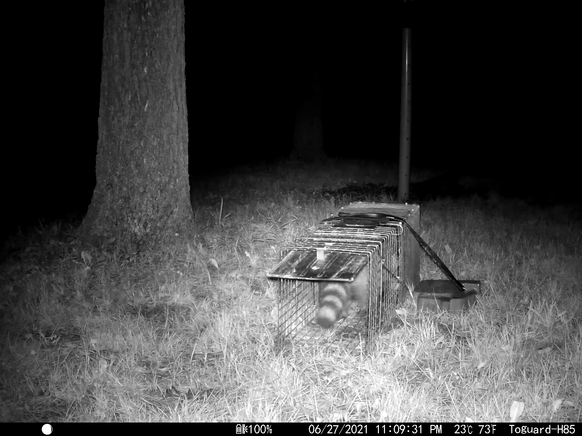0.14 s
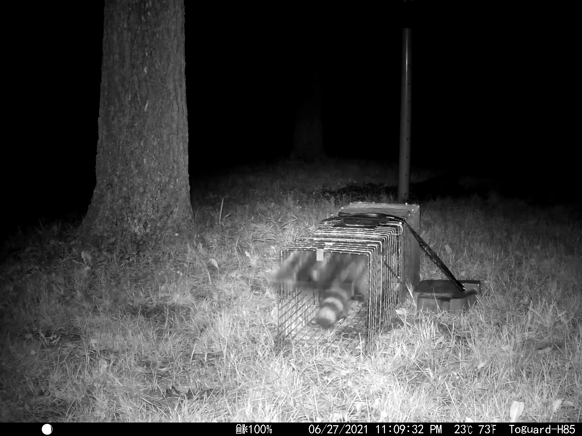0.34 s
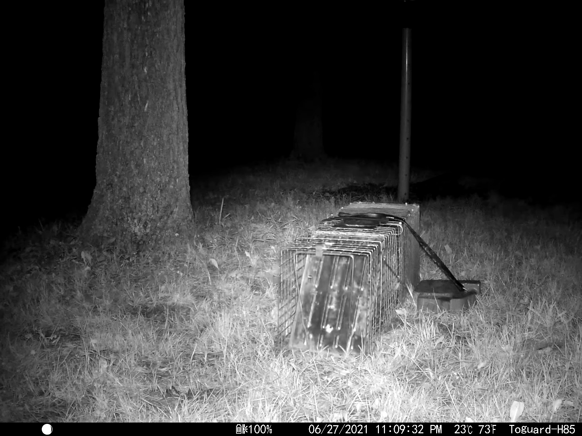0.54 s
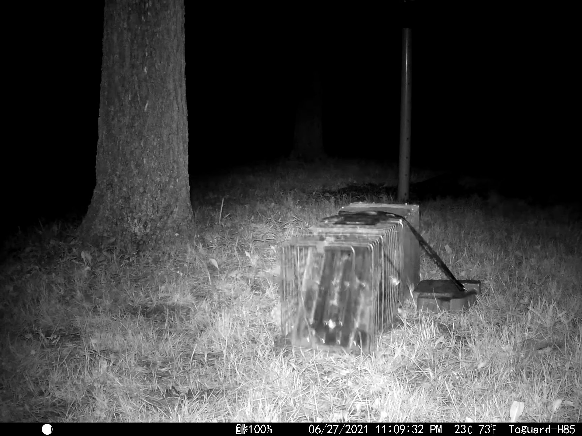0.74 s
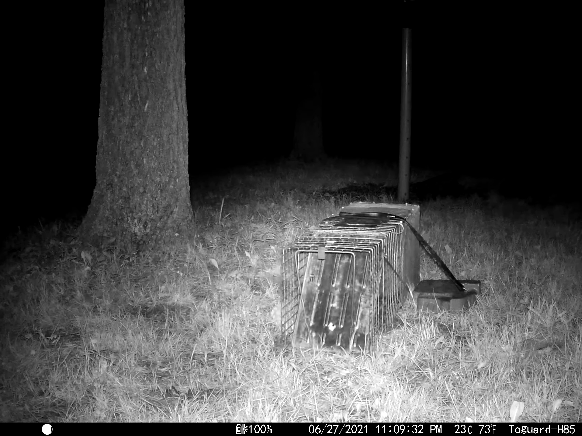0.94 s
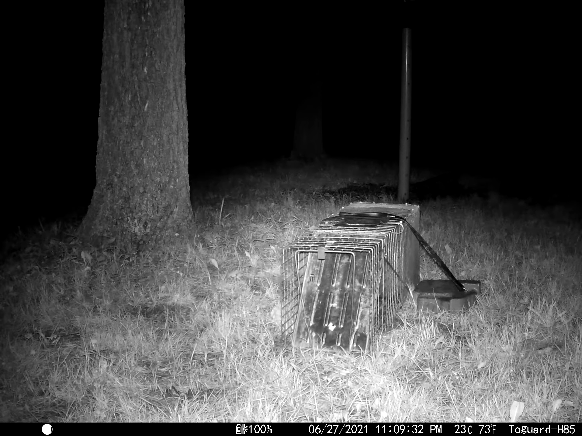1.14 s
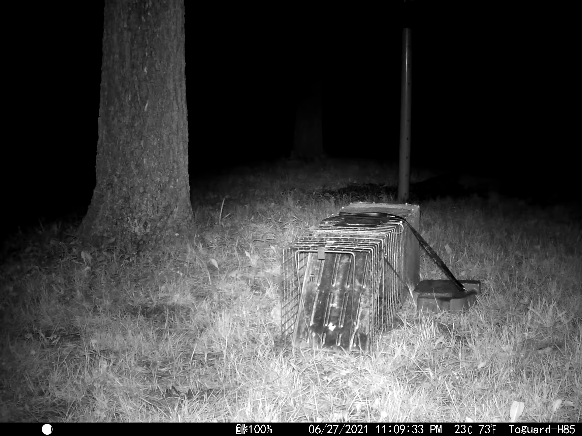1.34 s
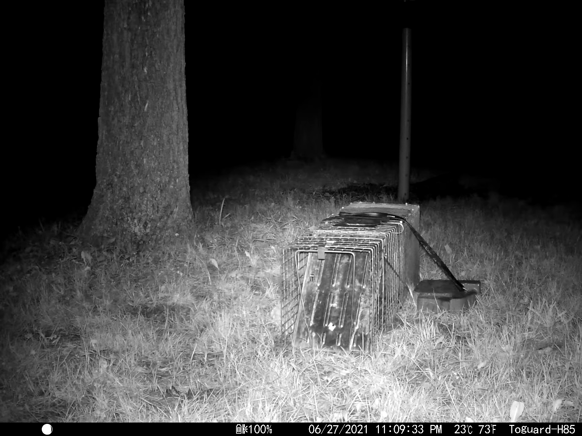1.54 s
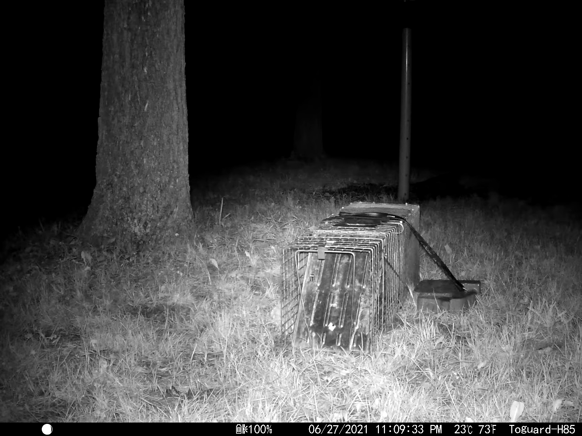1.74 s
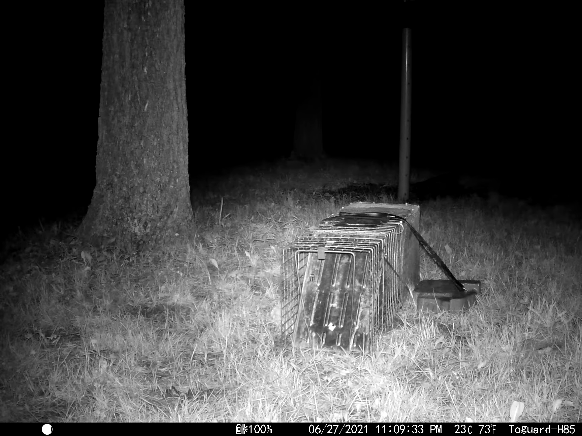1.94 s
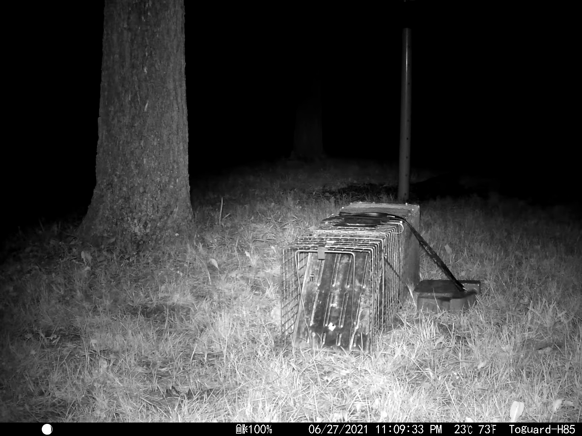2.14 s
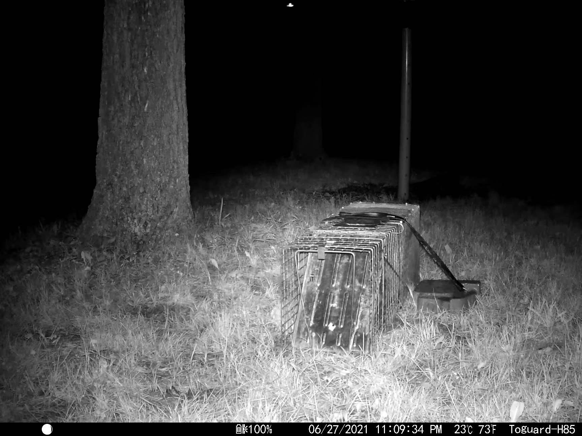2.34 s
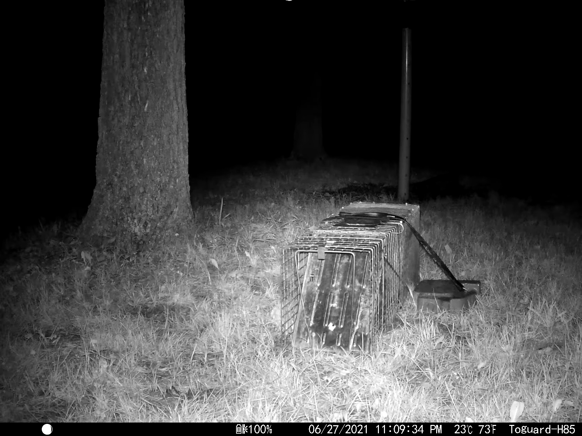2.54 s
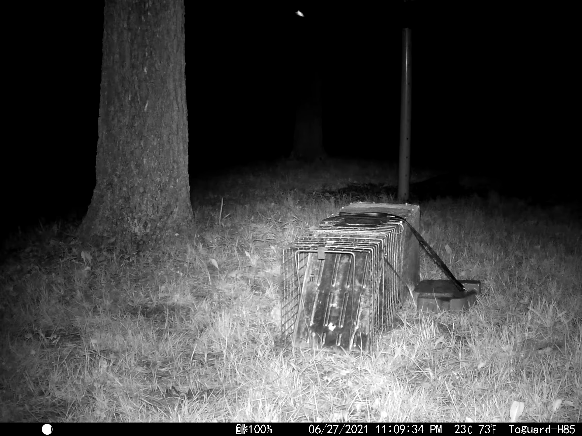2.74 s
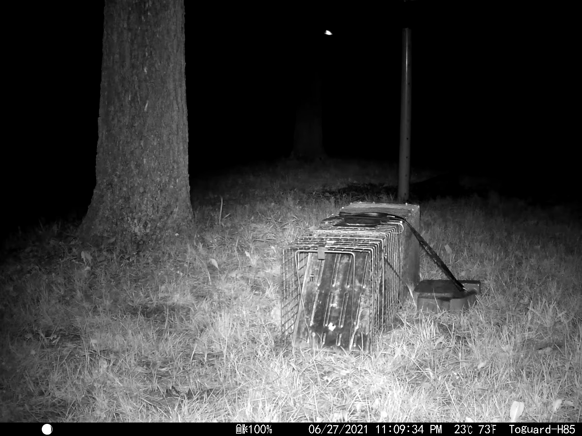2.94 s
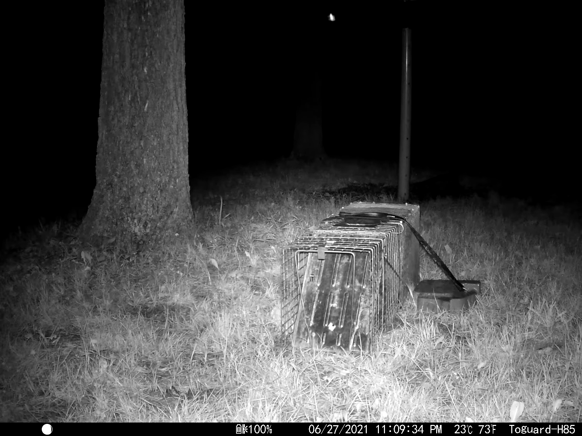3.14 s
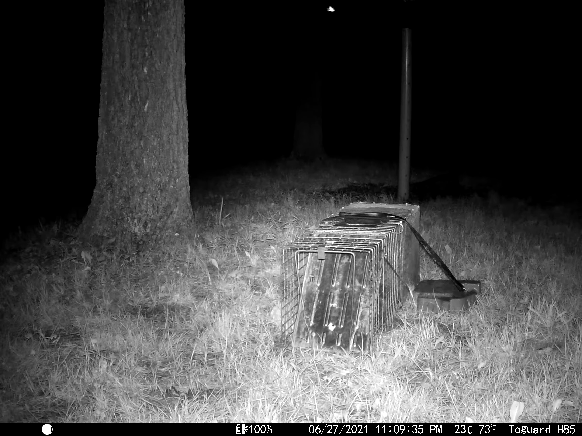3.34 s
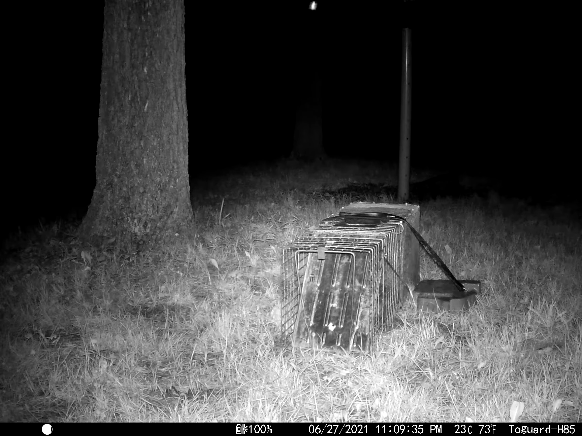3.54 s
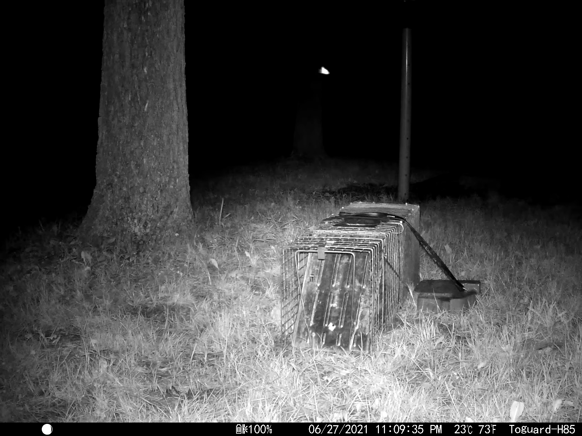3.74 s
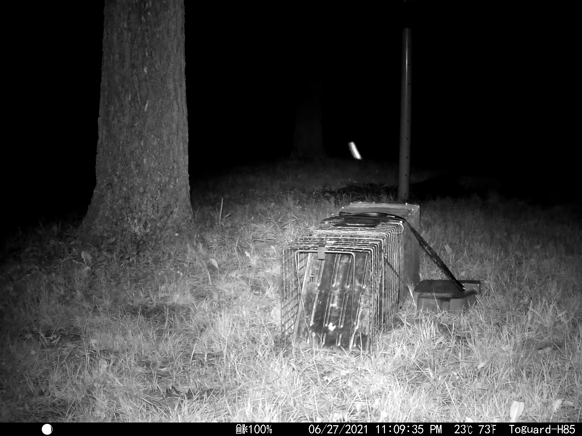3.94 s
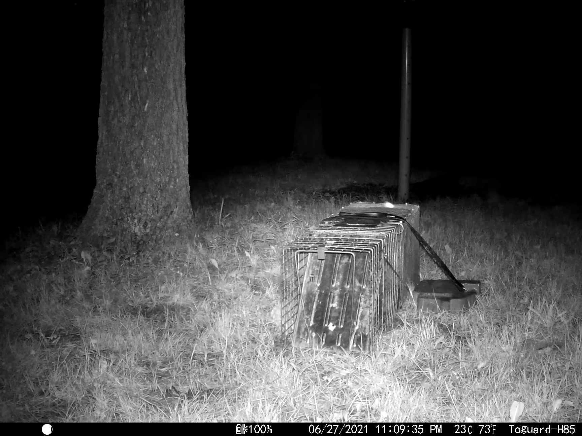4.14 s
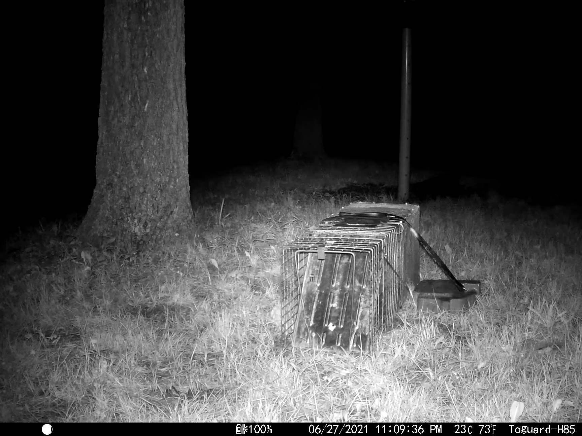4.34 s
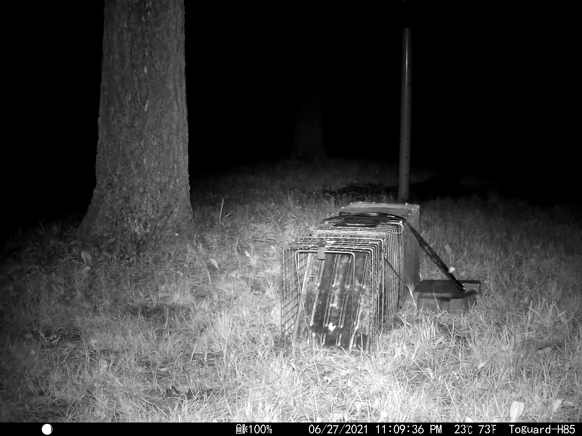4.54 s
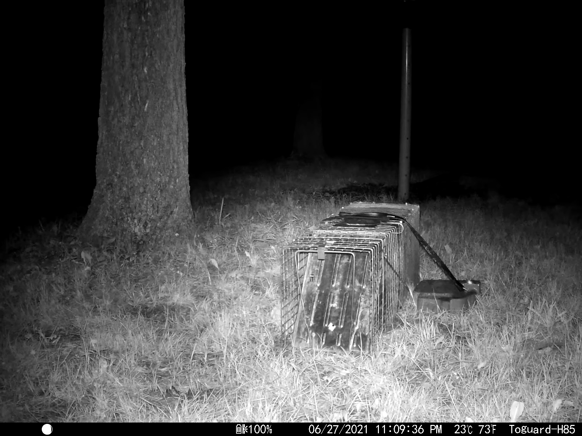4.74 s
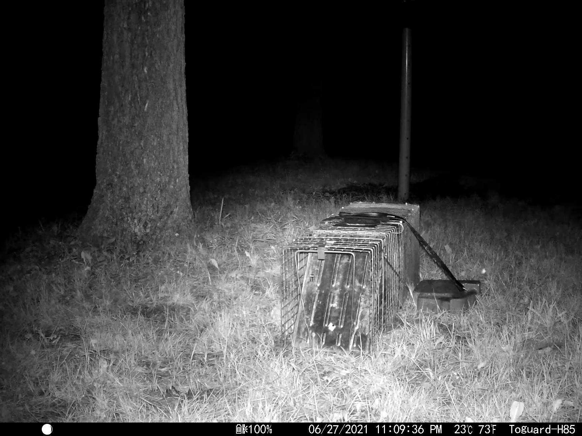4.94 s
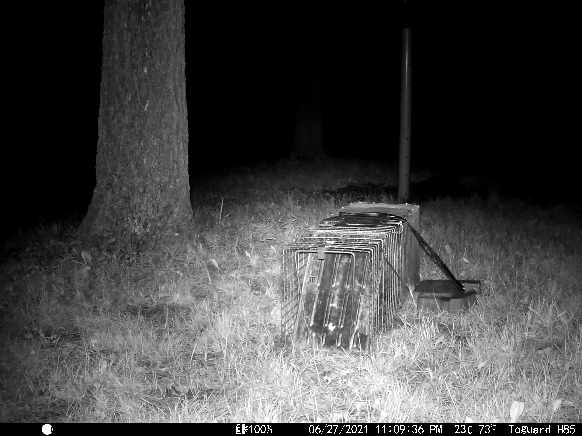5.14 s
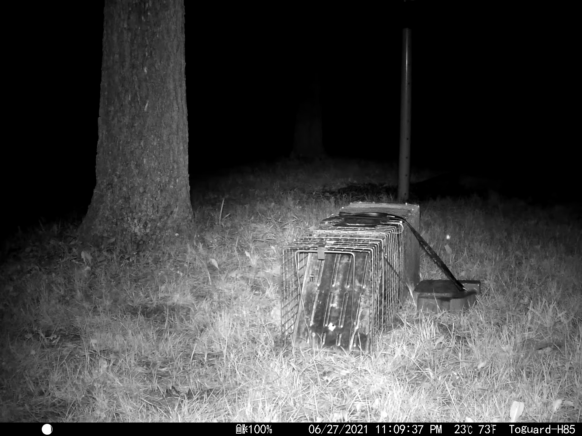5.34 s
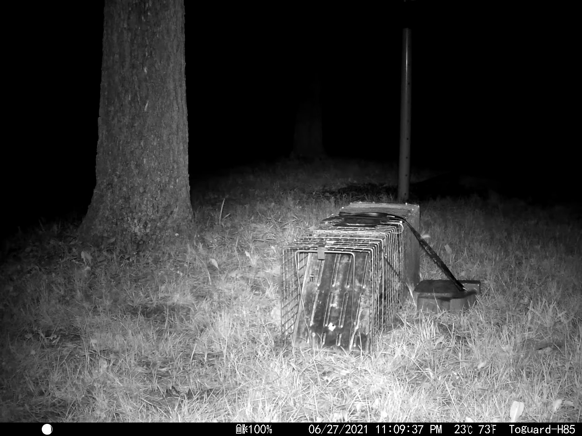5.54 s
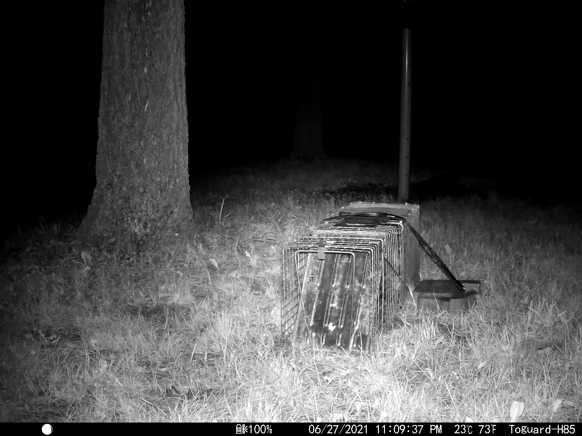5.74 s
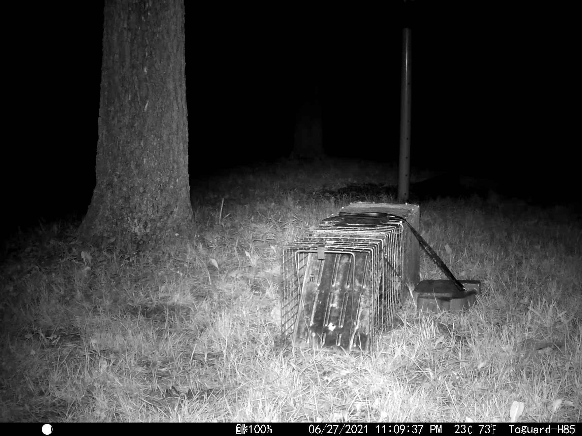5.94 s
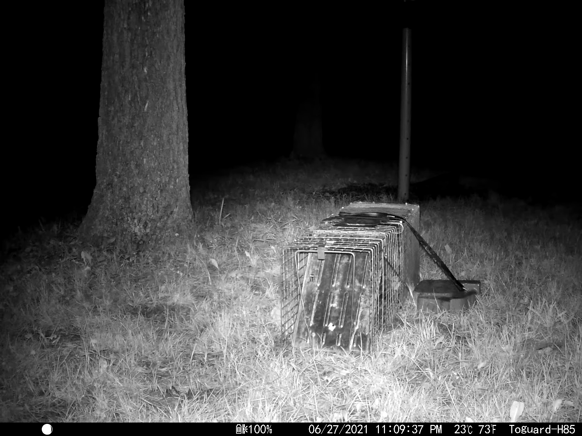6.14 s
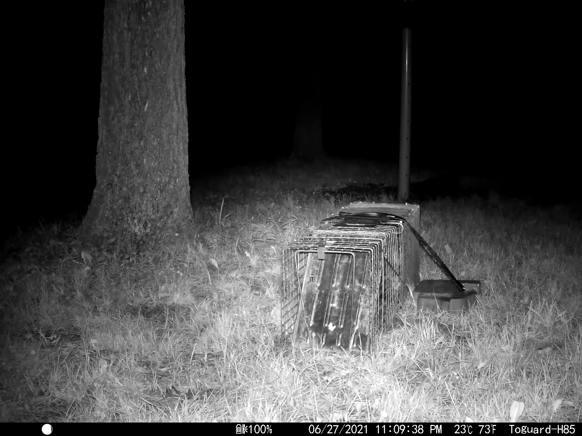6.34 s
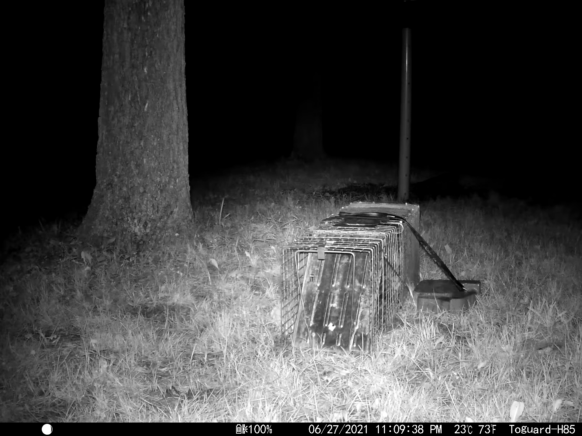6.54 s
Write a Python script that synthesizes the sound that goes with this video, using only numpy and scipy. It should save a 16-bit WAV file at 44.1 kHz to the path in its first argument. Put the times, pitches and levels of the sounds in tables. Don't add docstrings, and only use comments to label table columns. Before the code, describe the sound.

A sudden harsh metal crash of a mesh cage door breaks a calm grassy night: a slight scrape, a big clang, rattling wire, then a cluster of smaller bounces dying quickly. Afterwards a steady high cricket trill and a more distant chirping cricket carry on faintly, with a barely audible later stir of the cage. Breeze thuds softly on a hissy little microphone, growing towards the end.

```python
import sys
import numpy as np
from scipy import signal
from scipy.fft import rfft, irfft
from scipy.io import wavfile
from scipy.ndimage import uniform_filter1d

SR = 44100
rng = np.random.default_rng(int(sys.argv[2]) if len(sys.argv) > 2 else 0)


def undo_db(level):
    steps = np.asarray(level, float) / 20
    return 10 ** steps


def file_out(sig):
    cols = np.atleast_2d(sig).T
    lim = np.clip(cols, -1, 1)
    pcm = np.round(lim * 32767).astype(np.int16)
    wavfile.write(sys.argv[1], SR, pcm)


N = 291412

# pitch_hz, level_db (per Hz)
HISS_COLOUR = [(20, 5.5), (170, -3), (270, -8.5), (350, -8.5), (520, -12.5), (650, -14.5), (2100, -19.5),
               (4700, -19.5), (6000, -19), (13900, -21.5), (15600, -23)]
NIGHT_DB = -71.5

# start_s (middle of the eddy), level_db (peak), pitch_hz
PUFFS = [(1.589, -48, 57), (1.693, -49, 43), (1.733, -50, 53.6), (1.798, -45.5, 75), (1.976, -45, 50.2),
         (3.011, -51, 34.3), (3.137, -41.5, 62), (3.262, -51.5, 53), (3.421, -47, 38.6), (3.465, -45.5, 48),
         (4.325, -49, 50), (4.581, -50.5, 33.9), (4.744, -47, 53.7), (4.906, -39.5, 48.2), (5.124, -44, 95),
         (5.149, -46.5, 66), (5.179, -46, 59), (5.276, -42, 52.4), (5.332, -44.5, 71), (5.388, -46.5, 59),
         (5.432, -40, 43), (5.465, -48.5, 90), (5.552, -42.5, 71), (5.756, -38.5, 78.3), (6.279, -38.5, 80),
         (6.329, -60, 66), (6.363, -52, 49.7), (6.415, -45.5, 77), (6.485, -33.5, 83.5), (6.536, -47.5, 98)]
PUFF_HALF_WIDTH_CYCLES = 0.58
CALM_DB = -77
GUST_DB, GUST_REACH_S = -22.5, 0.076

# start_s, span_s (first to last pulse), level_db (last pulse)
CHIRPS = [(.0897, .024, -57), (.2798, 0.00079, -57), (1.1892, 0.019, -52.5), (1.4202, .023, -55),
          (1.6277, 0.023, -53), (1.814, 0.045, -52.5), (2.032, 0.037, -53.5), (2.2293, 0.038, -54),
          (2.427, .0435, -56.5), (2.7292, 0.023, -58.5), (2.8858, 0.037, -58.5), (3.0572, 0.046, -53),
          (3.2283, 0.042, -52), (3.419, 0.043, -50.5), (3.4865, 0.0011, -58.5), (3.648, 0.018, -53.5),
          (3.8327, .044, -54), (4.2694, 0.023, -53), (4.4808, .027, -55), (4.6900, 0.041, -51.5),
          (4.9382, 0.036, -51), (5.1542, 0.044, -51.5), (5.3672, .0225, -50.5)]
PULSE_GAP_S, PULSE_SWELL_DB = 0.023, 2.5
CHIRP_HZ, PULSE_RISE_HZ, PULSE_SCATTER_HZ = 4433, 25, 70.7

# time_s, level_db
TRILL_LEVEL = [(0, -61.5), (.3, -62.5), (1.3, -60), (1.77, -59), (2.44, -60), (2.72, -63.5), (3.11, -59),
               (3.5, -59.5), (4.2, -62), (4.9, -57.5), (5.48, -57.5), (6.13, -59.5), (6.45, -57),
               (6.6, -56)]
TRILL_RATE_HZ, TRILL_START_S, TRILL_SHARE = 39.132, 0.0165, 0.72

# start_s, level_db (rattle), fade_db_per_s
JOLTS = [(.368, -47, 59.5), (0.407, -34, 283), (0.461, -38, 79), (0.5423, -11.5, 250), (.570, -14.5, 124),
         (.645, -24.5, 65), (.735, -24.5, 80), (0.759, -17.5, 317), (0.811, -18.5, 338),
         (0.849, -23.5, 191), (.938, -43.5, 253), (1.021, -44.5, 473.5), (1.1, -51, 228),
         (3.721, -58, 550.5), (3.767, -68, 111)]
JOLT_RISE_S = 0.004
SETTLING_DB_S2 = 100
# level_db, share of the fade; a smaller share goes on shaking longer
PANELS, THICK, MIDDLE, THIN = (1.9, 0.64), (-0.59, 0.75), (0, 1.25), (5.5, 0.85)

# pitch_hz, width_hz, level_db
WIRES = [(1221, 145, -15.5), (1923, 23, -31), (2501, 110, -17), (2880, 240, -12.5), (3496, 21, -13.5),
         (3567, 80, -8), (4160, 40, -29), (4600, 14, -26), (4840, 44, -0.5), (5570, 79, 3), (5905, 37, 0.5),
         (6130, 17, -6), (6220, 45, 5), (6830, 15, -20.5), (7115, 110, 3), (7100, 23, -3), (8430, 160, -2),
         (9100, 30, -19), (9320, 63, -12.5), (9840, 63, -36), (10540, 170, -25), (11880, 110, -25)]
# pitch_hz, level_db (per Hz)
MESH_COLOUR = [(88, -45), (150, -12), (308, -5), (428, -12.5), (481, -9.5), (595, -30), (1240, -14.5),
               (1980, -16.5), (2410, -17.5), (4390, -6.5), (5870, -3.5), (7270, -8), (7860, -7.5),
               (8660, -14.5), (15500, -46)]
KNOCKS_PER_S, KNOCK_SPREAD_DB = 2600, 2.6
UNEVEN_DB = 2

# start_s, level_db (peak), pitch_hz (loudest ring)
BLOWS = [(0.375, -30.5, 5540), (0.407, -21, 6620), (0.4224, -33.5, 6830), (0.4678, -26.5, 5720),
         (0.491, -24.5, 5800), (0.5458, -20.5, 6150), (0.5524, 0.5, 6000), (0.5667, -8.5, 6250),
         (0.5781, 0.5, 5857), (0.5907, -6.5, 5786), (0.6206, -11.5, 5740), (0.6466, -8, 5860),
         (0.7416, -10.5, 5710), (0.7626, -11.5, 6130), (0.8011, -7, 6700), (0.813, -6.5, 7200),
         (0.855, -6, 6030), (0.8896, -28, 5800), (0.9402, -20.5, 6130), (1.0277, -32.5, 6110),
         (1.1038, -37.5, 5920)]

# start_s, level_db, place_hz (pitch favoured there), freedom to ring (factor on t60)
THUDS = [(.376, -44, 840, 0.15), (0.465, -38.5, 1197, 0.33), (0.553, -25, 417, 0.9),
         (0.565, -21.5, 300, 0.86), (.578, -16.5, 195, 0.3), (.586, -23, 841.3, .7),
         (0.599, -21.5, 373, 0.52), (.65, -29.5, 261, 0.61), (0.762, -31.5, 510, 0.67),
         (0.852, -28.5, 520, 0.17), (.862, -35, 813, 1), (0.883, -43, 189, 0.8), (.87, -35.5, 303, 1.15),
         (1.139, -49.5, 1250, 0.94)]
# pitch_hz, level_db, t60_s
FRAME_MODES = [(192, 1, .28), (255, -3, .2), (308, -5, .55), (380, -1, .28), (479, -4, .18), (544, -5, .2),
               (657, -14, .15), (786, -14, .25), (836, -11, .4), (1163, -14, .25), (1230, -14, .2)]

# start_s, end_s
DULL_MOMENTS = [
    (.351, .408),
    (.539, .569),
]
DULL_HZ, TOP_HZ = 8700, 15550


def unit(x):
    return x / np.sqrt(np.mean(x ** 2))


def band(x, lo_hz, hi_hz, order=2):
    return signal.sosfilt(signal.butter(order, [lo_hz, hi_hz], "band", fs=SR, output="sos"), x)


def low_pass(hz, stop_db):
    return signal.ellip(8, 0.1, stop_db, hz, fs=SR, output="sos")


def curve(rows):
    time_s, level_db = np.array(rows).T
    return np.interp(np.arange(N) / SR, time_s, level_db)


def shade(points, hz):
    pitch_hz, level_db = np.array(points).T
    return np.interp(np.log(hz), np.log(pitch_hz), level_db)


def decay(t, t60):
    return np.exp(-np.log(1000) * t / t60)


def walk(rate_hz):
    hold = int(SR / rate_hz)
    steps = np.repeat(rng.standard_normal(N // hold + 1), hold)
    return unit(uniform_filter1d(uniform_filter1d(steps, hold), hold)[:N])


def leaves(x, t60, wet_db):
    t = np.arange(SR // 3) / SR
    tail = rng.standard_normal(len(t)) * decay(t, t60) * np.minimum(t / 0.0079, 1)
    tail /= np.sqrt(np.sum(tail ** 2))
    return x + undo_db(wet_db) * signal.fftconvolve(x, tail)[:N]


def hiss():
    hz = np.maximum(np.arange(N // 2 + 1) * SR / N, 1)
    noise = irfft(rfft(rng.standard_normal(N)) * undo_db(shade(HISS_COLOUR, hz)), N)
    return noise / np.std(band(noise, 600, 3800, order=4)) * undo_db(NIGHT_DB)


def air():
    clock = np.arange(N) / SR
    breeze = np.full(N, undo_db(CALM_DB))
    for start_s, db, _ in PUFFS:
        breeze += undo_db(db + GUST_DB) * np.exp(-np.abs(clock - start_s) / GUST_REACH_S)
    rumble = unit(band(rng.standard_normal(N), 22, 170)) * breeze * undo_db(2.5 * walk(9.6))
    out = np.pad(rumble, (0, SR))
    t = np.arange(-SR // 8, SR // 8) / SR
    for start_s, db, hz in PUFFS:
        swell = np.exp(-0.5 * (t * hz / PUFF_HALF_WIDTH_CYCLES) ** 2)
        lopsided = 0.37 * np.sin(2 * np.pi * (hz * t + rng.random()))
        swing = np.sin(2 * np.pi * (hz * t + rng.random()) + lopsided)
        out[int(start_s * SR) - SR // 8:][:len(t)] += undo_db(db) * swell * swing
    return out[:N]


def stroke(share, top_hz, fall_hz, soft=0.6):
    share = np.clip(share, 0, 1)
    hz = top_hz - fall_hz * share ** 2.2
    return np.sin(np.pi * share) ** soft * np.sin(2 * np.pi * np.cumsum(hz) / SR)


def chirps():
    out = np.zeros(N)
    share = np.linspace(0, 1, int(0.0095 * SR))
    scatter = rng.standard_normal((len(CHIRPS), 4))
    for (start_s, span_s, db), chance in zip(CHIRPS, scatter):
        gaps = round(span_s / PULSE_GAP_S)
        for k in range(gaps + 1):
            to_go = gaps - k
            hz = CHIRP_HZ - PULSE_RISE_HZ * to_go + PULSE_SCATTER_HZ * chance[k]
            pulse = undo_db(db - 5 - PULSE_SWELL_DB * to_go ** 2) * stroke(share, hz, 400)
            pulse_s = start_s + span_s * k / max(gaps, 1)
            out[int(pulse_s * SR):][:len(share)] += pulse
    return leaves(out, 0.45, -0.5)


def trill():
    t = np.arange(N) / SR
    share = (t - TRILL_START_S) * TRILL_RATE_HZ % 1 / TRILL_SHARE
    first = stroke(share, 5425 + 14 * walk(60), 400, 1.2) * undo_db(1.5 * walk(150))
    neighbour_share = (t * 39.6 + 0.55) % 1 / 0.55
    neighbour = stroke(neighbour_share, 5700, 260, 1.2) * undo_db(-12 + 2.5 * walk(25))
    return unit(leaves(first + neighbour, 0.15, -5)) * undo_db(curve(TRILL_LEVEL))


def frame():
    out, t = np.zeros(N), np.arange(SR) / SR
    hz, mode_db, t60 = np.array(FRAME_MODES).T[:, :, None]
    for start_s, db, place_hz, freedom in THUDS:
        distance = np.abs(np.log(hz / place_hz)) / 0.98
        gain = undo_db(db + mode_db - 10 * np.minimum(distance, 1.5))
        modes = np.sin(2 * np.pi * (hz * t + rng.random(hz.shape))) * decay(t, t60 * freedom)
        out[int(start_s * SR):][:SR] += np.sum(gain * modes, axis=0) * np.minimum(t / 0.00521, 1)
    return band(out, 140, 1823)


def blows():
    out, t = np.zeros(N + SR), np.arange(SR // 4) / SR
    for start_s, db, hz in BLOWS:
        near_hz = np.clip(hz * np.exp(0.2 * rng.standard_normal((14, 1))), 3000, 10500)
        neighbours = np.sin(2 * np.pi * (near_hz * t + rng.random((14, 1))))
        neighbours = np.sum(neighbours, axis=0) / np.sqrt(14)
        crack = band(rng.standard_normal(len(t)), 1330, 9000) * np.exp(-t / 0.0083)
        wires = (np.sin(2 * np.pi * hz * t) + undo_db(-3) * neighbours) * decay(t, 0.11)
        hit = (wires + undo_db(-6) * crack) * np.minimum(t / 0.00068, 1)
        out[int(start_s * SR):][:len(t)] += undo_db(db - 8) * hit
    return out[:N]


def shaking(t, part):
    part_db, fade_share = part
    start_s, db, fade_db = np.array(JOLTS).T[:, :, None]
    since = np.maximum(t - start_s, 0)
    level_db = db + part_db - fade_share * fade_db * since - SETTLING_DB_S2 * since ** 2
    power = undo_db(2 * level_db) * np.minimum(since / JOLT_RISE_S, 1) ** 2
    return 10 * np.log10(np.sum(power, axis=0) + 1e-12)


def ring(x, hz, t60):
    pole = np.exp((2j * np.pi * hz - np.log(1000) / t60) / SR)
    return signal.lfilter([1], [1, -pole], x).imag


def mesh_rings():
    weak_hz = np.concatenate([np.geomspace(160, 3000, 70), np.linspace(3000, 15400, 130)])
    rings = []
    for hz in weak_hz * (1 + 0.01 * rng.standard_normal(200)):
        crowding_db = 10 * np.log10(min(hz / 3000, 1))
        db = shade(MESH_COLOUR, hz) - 6.5 + crowding_db + UNEVEN_DB * rng.standard_normal()
        rings.append((hz, db, 0.044))
    for hz, width_hz, db in WIRES:
        rings.append((hz, db, 0.89 * np.log(1000) / np.pi / width_hz))
    return rings


def rattle(start_s, length_s):
    start, span = int(start_s * SR), int(length_s * SR)
    knocks = np.flatnonzero(rng.random(span) < KNOCKS_PER_S / SR)
    knock_s = (start + knocks) / SR
    panels_db, thick_db, middle_db, thin_db = (shaking(knock_s, p) for p in (PANELS, THICK, MIDDLE, THIN))
    size = undo_db(KNOCK_SPREAD_DB * rng.exponential(size=len(knocks)))
    out = np.zeros(N)
    for hz, ring_db, t60 in mesh_rings():
        if hz < 2700:
            part_db = panels_db - 6 * (hz < 520)
        elif hz < 4400:
            part_db = thick_db
        else:
            thinness = np.clip((hz - 8700) / 1200, 0, 1)
            part_db = middle_db + (thin_db - middle_db) * thinness
        push = np.zeros(span + SR // 3)
        push[knocks] = size * undo_db(part_db) * rng.standard_normal(len(knocks))
        out[start:][:len(push)] += undo_db(ring_db) / np.sqrt(t60) * ring(push, hz, t60)
    return out * undo_db(-30.5)


def scene():
    mesh = rattle(0.36, 0.94) + rattle(3.7, 0.16)
    cage = leaves(mesh + blows() + frame(), 0.22, -12)
    return (hiss() + air() + chirps() + trill() + cage)[None]


def top_cut(x):
    return signal.sosfilt(signal.butter(12, 15720, fs=SR, output="sos"), x)


def record(dry):
    x = np.tanh(1.2 * dry) / 1.2
    x = signal.sosfilt(low_pass(TOP_HZ, 70), x)
    dull = signal.sosfiltfilt(low_pass(DULL_HZ, 55), x)
    t = np.arange(N) / SR
    dullness = np.zeros(N)
    for start_s, end_s in DULL_MOMENTS:
        dullness += (t > start_s) & (t < end_s)
    dullness = uniform_filter1d(dullness, 130)
    return top_cut(x + dullness * (dull - x))


dry = scene()
out = record(dry)
file_out(out)
```